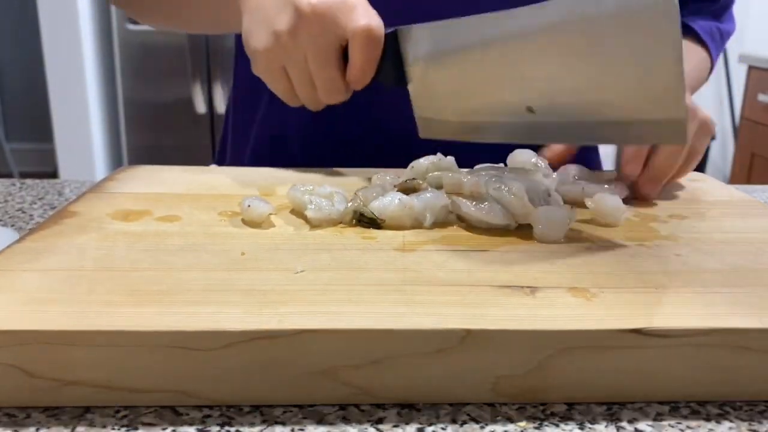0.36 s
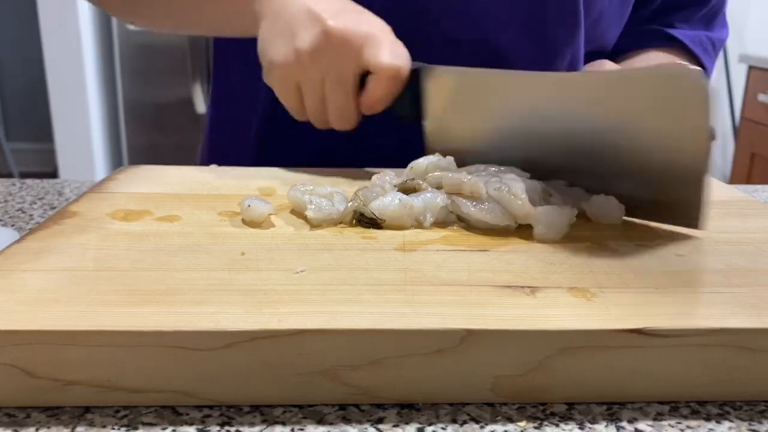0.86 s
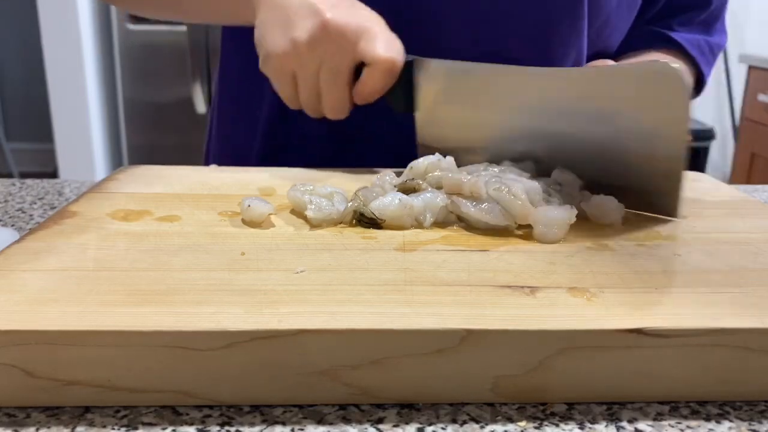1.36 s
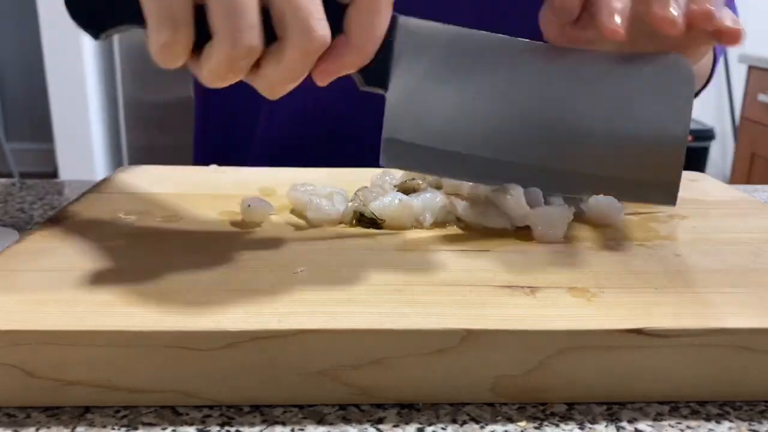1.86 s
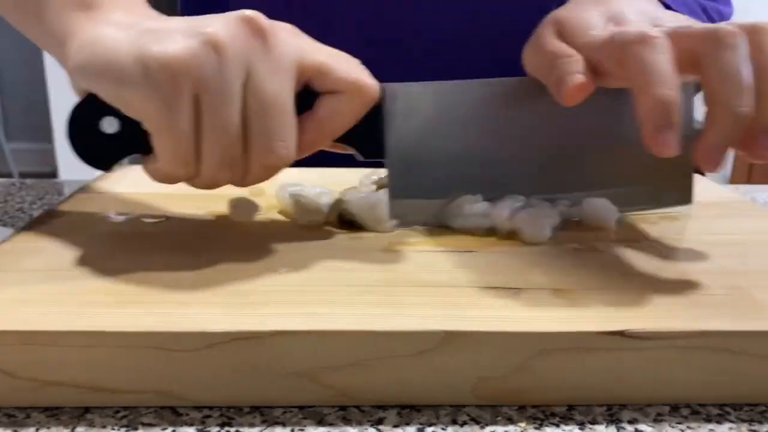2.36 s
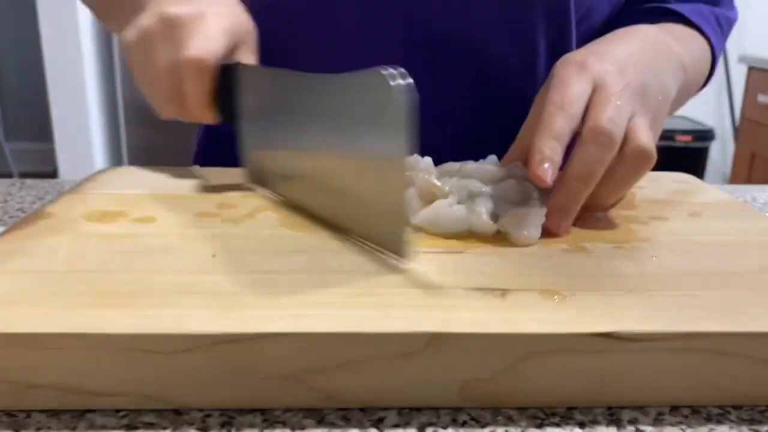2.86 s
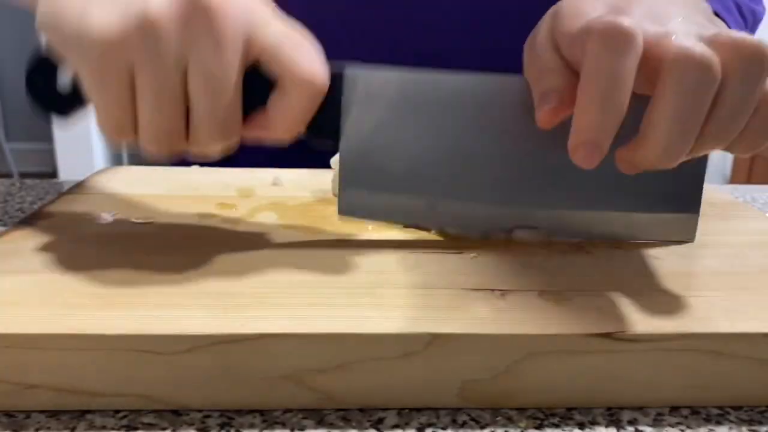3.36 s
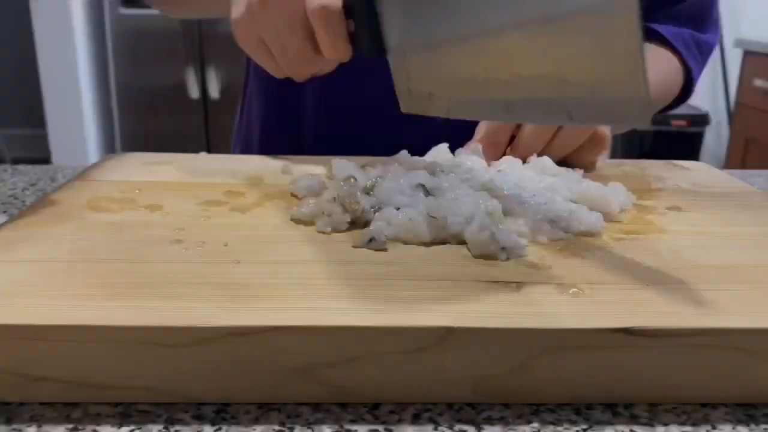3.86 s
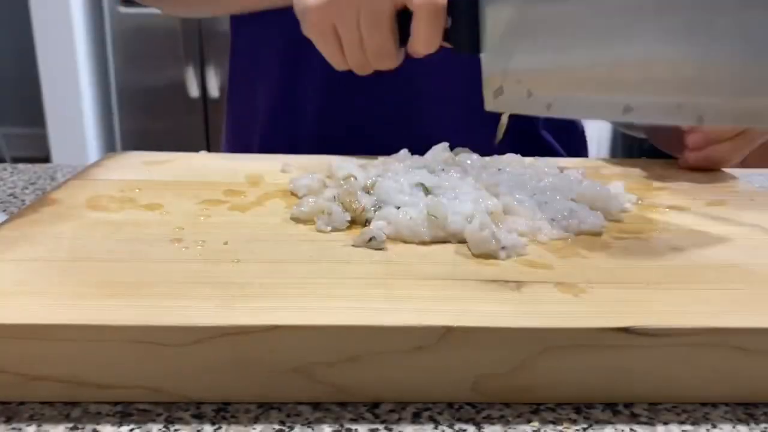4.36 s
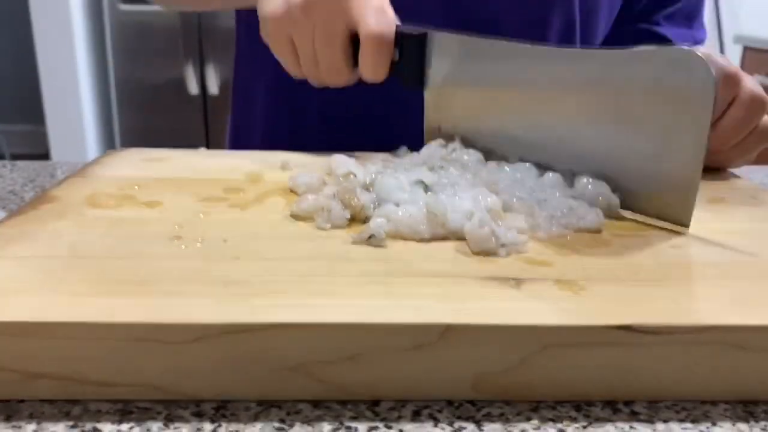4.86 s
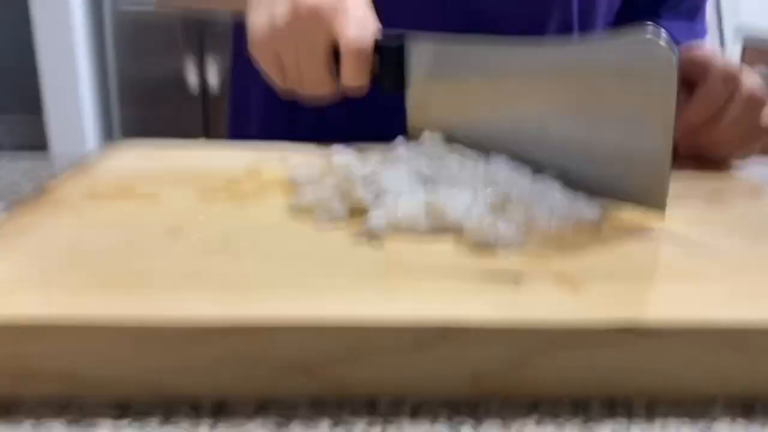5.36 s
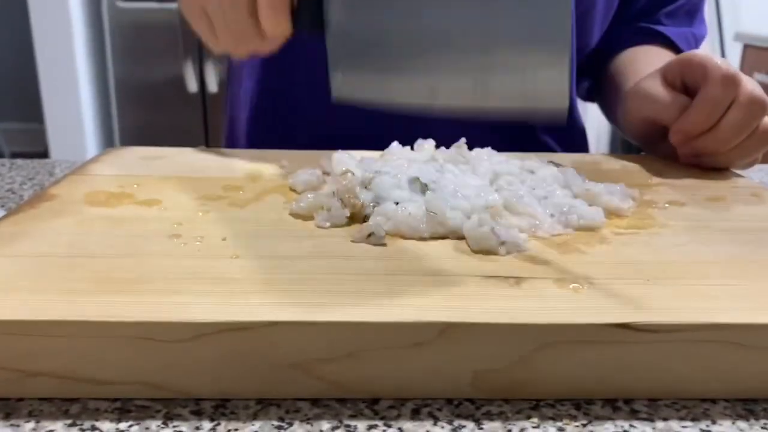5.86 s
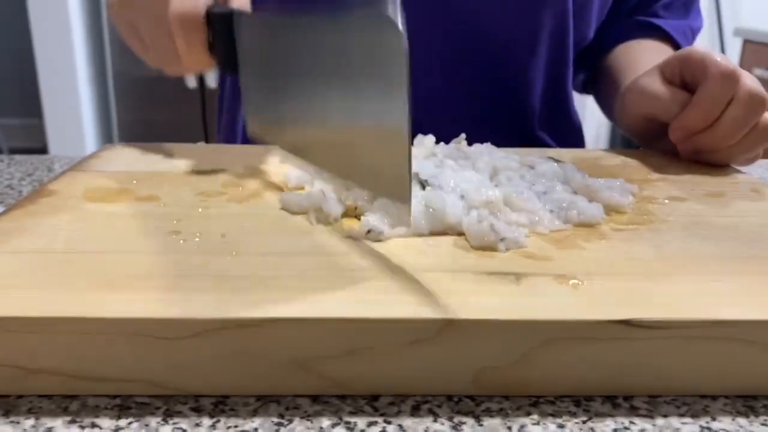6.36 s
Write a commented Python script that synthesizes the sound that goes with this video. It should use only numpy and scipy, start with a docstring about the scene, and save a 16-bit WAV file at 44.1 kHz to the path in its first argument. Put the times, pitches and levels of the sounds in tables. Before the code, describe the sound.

Wet scraping and uneven woody knocks on a cutting board, then rapid regular cleaver chops about nine times a second, with short hard-room reverberation.

```python
"""A cleaver works wet shrimp on a thick board on a stone counter, played faster than life.
To 3.6 s the blade knocks, pushes and scrapes the heap together: noise-driven board modes, hiss, grain, low thuds.
After an edit, entered on the room tail of a chop cut away, it chops about nine times a second.
The speed-up smears every blow into a short noise burst; a small hard kitchen rings behind as decaying noise."""
import sys
import numpy as np
from scipy import signal
from scipy.fft import rfft, irfft, next_fast_len
from scipy.io import wavfile
from scipy.ndimage import uniform_filter1d

SR = 44100
rng = np.random.default_rng(int(sys.argv[2]) if len(sys.argv) > 2 else 0)


def transcribe(u):
    """Save the signal u as a 16-bit wav file named by the first command-line argument.

    u: samples, shape (n,) or (channels, n), limited to [-1, 1]; the rate is SR.
    q: integer samples, one column per channel.
    """
    v = np.clip(np.atleast_2d(u).T, -1, 1)
    q = np.round(v * 32767).astype(np.int16)
    wavfile.write(sys.argv[1], SR, q)


def gain_from_decibels(decibels):
    """Convert decibel values to linear amplitude factors."""
    exponent = np.asarray(decibels, float) / 20
    return 10 ** exponent


N = 296793
PIECE = 8000   # samples in one event
SIZE = next_fast_len(N + SR)
HZ = np.maximum(np.fft.rfftfreq(SIZE, 1 / SR), 1)
EDIT_S = 3.615

# low air of the room: (frequency [Hz], relative level [dB/Hz])
AIR_SPECTRUM = [(15, -31.5), (25, -30), (69, 3), (90, -11.5), (121, -4.5), (142, -23), (176, -16.5),
                (224, -24), (588, -40), (15000, -59)]
# likeness of left and right: (frequency [Hz], correlation [0-1])
STEREO_LIKENESS = [(40, 1), (200, 0.9), (400, 0.71), (650, 0), (1400, 0.34), (3000, 0.42), (7000, 0.54),
                   (8500, 0.98), (13500, .95), (15000, 0.9)]
# phase between left and right, stereo processing flips narrow treble bands:
# (frequency [Hz], left leads by [rad])
STEREO_PHASE = [(60, 0), (7900, 0), (8500, -np.pi), (9500, -np.pi), (10100, -2 * np.pi),
                (12200, -2 * np.pi), (12700, -3 * np.pi), (13700, -3 * np.pi), (14200, -4 * np.pi)]
# level between left and right: (frequency [Hz], left over right [dB])
STEREO_TILT = [(60, 0), (140, 3), (500, -3), (1170, 1.5), (2400, 1.4), (4200, 3.5), (9800, 0.4),
               (15000, -1.5)]
# room decay: (frequency [Hz], T60 [s])
ROOM_DECAY = [(150, 0.55), (400, 0.16), (1500, 0.31), (2600, 0.31), (5000, 0.33), (9000, .25)]
# room drive, before the final treble step: (frequency [Hz], level against direct sound [dB])
ROOM_SPECTRUM = [(150, -19), (330, -25.5), (440, -16), (560, -18.5), (700, -9.5), (1100, -15),
                 (1700, -13.5), (2500, -10.5), (4000, -4.5), (5500, -6.5), (9000, -12.5)]
# light taps on the steel: (time [s], relative level [dB])
BLADE_TAPS = [(1.749, -74.5), (3.066, -75)]
# ringing of the steel: (frequency [Hz], relative level [dB], T60 [s])
BLADE_MODES = [(1214, -7.0, 0.048), (2062, 6.5, 0.078), (2820, -7.5, .06), (5265, 2, .05),
               (6550, -7.5, 0.046)]
# brief coloured squeaks, clanks and knocks:
# (time [s], frequency [Hz], level [dB], rise and fall [ms])
COLOURED_EVENTS = [(0.771, 1190, -52, 14), (0.903, 4840, -53, 16), (0.909, 5630, -57, 15),
                   (1.299, 1920, -57, 11), (1.431, 4220, -52.5, 17), (1.469, 2980, -70, 36),
                   (1.865, 630, -47.5, 24), (2.11, 1420, -52, 15), (2.751, 1130, -33.5, 15.5),
                   (3.07, 1234, -64, 12), (3.222, 2210, -57, 8), (3.469, 401, -49, 24),
                   (6.173, 3530, -37, 8.6), (6.275, 3400, -33, 14)]
# drag speed as hiss level, one list per stretch of scraping, several strokes in each:
# (time [s], level [dB])
SCRAPE_STRETCHES = [
    [(0.0, -60), (0.026, -52.5), (0.066, -61.5), (0.092, -51.5), (0.144, -63), (0.174, -50.5),
     (0.312, -103), (0.362, -75), (0.45, -91)],
    [(0.62, -103), (0.682, -51), (0.736, -62.5), (0.768, -49.5), (0.788, -55), (0.874, -58.5),
     (0.908, -55.5), (0.954, -84), (1.0, -81)],
    [(1.08, -103), (1.116, -71), (1.134, -89.5), (1.212, -57), (1.4, -61.5), (1.432, -47.5), (1.472, -75),
     (1.53, -83), (1.6, -83)],
    [(1.7, -86), (1.75, -66.5), (1.808, -103), (1.866, -73), (1.888, -85), (1.976, -45.5), (1.998, -50.5),
     (2.042, -75.5), (2.08, -98)],
    [(2.08, -71), (2.136, -61), (2.164, -62.5), (2.186, -46.5), (2.2, -58), (2.256, -49), (2.428, -77),
     (2.48, -66), (2.6, -86.5)],
    [(2.7, -98.5), (2.752, -50.5), (2.77, -56), (2.816, -38.5), (2.852, -43), (2.892, -60.5), (3.02, -91),
     (3.068, -66.5), (3.15, -90)],
    [(3.15, -98), (3.226, -62), (3.28, -97), (3.34, -45), (3.378, -75.5), (3.504, -68), (3.534, -40),
     (3.59, -63.5), (3.61, -90)],
]
# how hard each stretch presses: (level [dB])
STRETCH_PRESSURE_DB = [2.5, 2, 3.5, -3, 7, -21, 1]
# wet hiss, fibre grain, board rumble: (frequency [Hz], relative level [dB/Hz])
HISS_SPECTRUM = [(1470, -12.5), (2500, -7), (5870, -8), (6810, -3.5), (8140, -7.5), (11200, -9),
                 (12800, -10.5), (14600, -15.5), (15750, -13), (16100, -95.5)]
GRAIN_SPECTRUM = [(290, -32), (500, -17.5), (611, 1), (766, -10), (1240, -9), (1400, -9.5), (4000, -28),
                  (5200, -49), (8800, -120)]
RUMBLE_SPECTRUM = [(18, -41), (30, -8.5), (65, -2), (162, -10.5), (203, -16.5), (357, -19.5), (424, -20),
                   (700, -37.5), (910, -69), (1540, -120)]
# further low board thuds, alone or beside a blow:
# (time [s], level [dB], pitch [Hz], length scale [ms])
FURTHER_THUDS = [(0.073, -52, 78.5, 7.6), (0.874, -47, 83.4, 28), (1.343, -45, 60.6, 31),
                 (1.881, -27, 86, 13), (1.972, -30.5, 87, 15), (2.045, -53, 93, 19),
                 (2.138, -25.5, 93.4, 45), (2.195, -32, 84.6, 13), (2.493, -36, 110, 35),
                 (2.918, -39, 91, 9.5), (3.364, -34.5, 86, 24), (3.563, -32.5, 105, 14),
                 (3.631, -31.5, 85, 8.8), (5.845, -29, 101, 33), (6.38, -21, 100, 6.6)]
# low board modes, the knock: (frequency [Hz], width [Hz], relative level [dB])
KNOCK_BOARD_MODES = [(225.2, 24.3, -6), (299.5, 20.7, -2.5), (407.8, 49.9, 3.95), (453.3, 84, -1.5)]
# high board modes, the crack: (frequency [Hz], width [Hz], relative level [dB])
CRACK_BOARD_MODES = [(657, 112, -8), (927, 111, -4), (1055, 150, -1), (1182, 157.6, -2.62),
                     (1328, 151, -5.5), (1553, 278, -10), (1902, 184, -11.5), (2196, 133, -12.5),
                     (2470, 157, -14.5), (3440, 240, -21.5), (3900, 1300, -27.5)]
# blade set down or pushed while gathering:
# (time [s], knock [dB], crack [dB], thud [dB], smear scale [ms])
GATHER_KNOCKS = [(0.036, -42, -55, -66, 54), (0.36, -64.5, -63, -52, 23), (0.697, -46, -64, -31, 15),
                 (0.76, -40.5, -56, -37, 25), (1.241, -25.5, -48.5, -28, 18), (1.859, -30, -48, -30, 11),
                 (2.012, -35.5, -46.5, -15.5, 12), (2.125, -31.5, -38.5, -35.5, 17),
                 (2.144, -23, -23, -32, 6.6), (2.756, -15, -24.5, -21, 7), (2.789, -24, -27, -22, 20),
                 (2.832, -26.5, -34, -21.5, 37.4), (3.224, -27.5, -49.5, -22.5, 9.7),
                 (3.338, -40.5, -43.5, -27.5, 12), (3.429, -46.5, -63, -46, 17),
                 (3.541, -40, -41, -26, 12.3)]
# fast chops through the heap: (time [s], knock [dB], thud [dB], splash [dB], smear scale [ms])
FAST_CHOPS = [(4.125, -16.5, -18, -46, 10.8), (4.243, -16, -17, -48, 11.3), (4.362, -16.5, -23, -42.5, 9.7),
              (4.467, -17, -21.5, -46, 11.4), (4.577, -19.5, -22, -50, 11.4),
              (4.686, -28, -20.5, -54.5, 8.2), (4.78, -22.5, -25, -55, 12.5), (4.798, -20, -25, -47.5, 6.2),
              (4.901, -19.5, -21, -49.5, 10.5), (5.004, -17, -19.5, -47.5, 9.4),
              (5.102, -36.5, -20.5, -50.5, 7.4), (5.209, -18, -21.5, -42, 9.7),
              (5.321, -64, -23.5, -51, 23), (5.424, -16, -20, -47.5, 8.5), (5.521, -21, -22, -54, 10.8),
              (5.538, -21.5, -27, -43.5, 8.4), (5.64, -33.5, -19.5, -46.5, 5.3),
              (5.739, -18, -16.5, -46, 11.4), (5.858, -18, -21.5, -46, 12.2), (5.963, -17, -19, -40.5, 7.8),
              (6.067, -19, -19.5, -42, 13.8), (6.178, -20, -23, -37.5, 10.8), (6.277, -17.5, -17, -38, 9.7),
              (6.387, -20.5, -19, -48.5, 16.2), (6.481, -19.5, -18.5, -53.5, 15.4),
              (6.585, -64, -26, -65, 15.5), (6.69, -23, -17.5, -54, 9.1)]
# blade travels along the board: (time [s], thud pitch [Hz], crack against knock [dB])
BLADE_TRAVEL = [(4.1, 103, -2), (4.6, 96.7, -3), (5.2, 96, -0.4), (5.7, 99, -1.9), (6.2, 115, 0.5),
                (6.7, 105, -3.5)]
# chop cut away, heard only through the room:
# (knock [dB], crack [dB], splash [dB], hardness [dB/octave], smear scale [ms])
UNHEARD_CHOP = (-10.5, -18.5, -42, -3, 16.0)


def rms_one(x):
    """Scale to rms 1."""
    return x / np.sqrt(np.mean(x ** 2) + 1e-20)


def at_hz(points, hz=HZ):
    """Read a table at given frequencies, straight on a log axis."""
    table = np.array(points)
    return np.interp(np.log(hz), np.log(table[:, 0]), table[:, 1])


def through(x, response):
    """Filter by a frequency response."""
    return irfft(rfft(x, SIZE) * response, SIZE)[..., :N]


def pair(mid_side):
    """Turn two noises into left and right, alike by frequency."""
    alike = np.clip(at_hz(STEREO_LIKENESS), 0, 1)
    mid, side = rfft(mid_side, SIZE)
    both = np.sqrt(1 + alike) * mid + np.sqrt(1 - alike) * side * [[1], [-1]]
    return irfft(both, SIZE)[:, :N]


def coloured(spectrum):
    """Steady stereo noise of a spectrum, rms 1."""
    return rms_one(through(pair(rng.standard_normal((2, N))), gain_from_decibels(at_hz(spectrum))))


def mottled(x, patchy_db):
    """Shifting wet contact: narrow colours come and go every few hundredths of a second."""
    cells = signal.stft(x, nperseg=512)[2]
    field = rng.standard_normal(cells.shape[1:])
    field = uniform_filter1d(field, size=3, axis=0)   # across frequency
    field = uniform_filter1d(field, size=7, axis=1)   # across time
    gain = rms_one(gain_from_decibels(patchy_db * rms_one(field)))
    return signal.istft(cells * gain, nperseg=512)[1][:, :N]


def resonate(x, modes):
    """Parallel two-pole resonances, signs alternating."""
    out = 0
    for k, (hz, width_hz, level_db) in enumerate(modes):
        r = np.exp(-np.pi * width_hz / SR)
        b = [(1 - r * r) / 2, 0, (r * r - 1) / 2]
        a = [1, -2 * r * np.cos(2 * np.pi * hz / SR), r * r]
        out = out + (-1) ** k * gain_from_decibels(level_db) * signal.lfilter(b, a, x)
    return out


def burst(rise_ms, fall_ms, sharp):
    """Smeared-blow envelope: swells for the rise, dies over the fall, peaks in the middle."""
    ms = np.arange(-PIECE // 2, PIECE // 2) * 1000 / SR
    distance = np.abs(np.where(ms < 0, ms / rise_ms, ms / fall_ms))
    return np.hanning(PIECE) * np.exp(-distance ** sharp)


def add(track, time_s, piece):
    """Lay a piece with its middle at a time."""
    at = round(time_s * SR) - piece.shape[-1] // 2
    low, high = max(at, 0), min(at + piece.shape[-1], N)
    track[..., low:high] += piece[..., low - at:high - at]


def at_peak(piece, level_db):
    """Set the loudest 10 ms of a piece to a level."""
    loudest = uniform_filter1d(np.mean(piece ** 2, axis=0), size=441).max()
    return piece * gain_from_decibels(level_db) / np.sqrt(loudest)


def dulled(x, cutoff_hz):
    """Wood passes little treble: second-order lowpass."""
    return signal.lfilter(*signal.butter(2, cutoff_hz, fs=SR), x)


def air():
    """Low room air: steady coloured noise."""
    return gain_from_decibels(-61) * coloured(AIR_SPECTRUM)


def kitchen(first, second, after):
    """Diffuse wash: sound energy builds and dies at its own rate in each third of an octave."""
    build_s, step = 0.03, 64   # step: samples per energy reading
    out, white = 0, pair(rng.standard_normal((2, N)))
    edges_hz = 134 * 2 ** np.arange(0, 6, 1 / 3)
    heard = np.stack([first.mean(axis=0), second.mean(axis=0)])
    build = np.exp(-step / SR / build_s)
    for k, (low_hz, high_hz) in enumerate(zip(edges_hz, edges_hz[1:])):
        band = signal.butter(2, [low_hz, high_hz], "band", fs=SR, output="sos")
        hz = np.sqrt(low_hz * high_hz)
        power = signal.sosfilt(band, heard) ** 2
        power = power[:, :N // step * step].reshape(2, -1, step).mean(axis=2)
        keep = gain_from_decibels(-120 * step / SR / at_hz(ROOM_DECAY, hz))   # power kept per step
        poles = np.convolve([1, -keep], [1, -build])
        energy = signal.lfilter([0, (1 - keep) * (1 - build)], poles, power + 1e-18)
        held = [np.interp(np.arange(N) / step, np.arange(len(e)), np.sqrt(e)) for e in energy]
        level = held[0] * (1 - after) + held[1] * after
        noise = rms_one(signal.sosfilt(band, white))
        out = out + (-1) ** k * gain_from_decibels(at_hz(ROOM_SPECTRUM, hz)) * level * noise
    return through(out, 0.32 + 0.58 / np.sqrt(1 + (HZ / 2650) ** 20))   # step down in the treble


def blade():
    """Light taps set the steel ringing: noise bursts drive decaying modes."""
    drive, out = np.full(N, 1e-18), 0
    for time_s, level_db in BLADE_TAPS:
        noise = rng.standard_normal(PIECE) * burst(14.0, 14.0, sharp=0.96)
        add(drive, time_s, gain_from_decibels(level_db - 16.5) * noise)
    for hz, level_db, t60_s in BLADE_MODES:
        r, w = gain_from_decibels(-60 / (t60_s * SR)), 2 * np.pi * hz / SR
        b, a = [0, gain_from_decibels(level_db) * np.sin(w)], [1, -2 * r * np.cos(w), r * r]
        out = out + signal.lfilter(b, a, drive)
    return out


def squeaks_and_clanks():
    """Noise caught for a moment by one resonance; louder ones are rougher, wider in band."""
    mean_width_hz, wider_per_db, mean_db = 295, 0.74, -47.5
    out = np.zeros((2, N))
    for time_s, hz, level_db, length_ms in COLOURED_EVENTS:
        width_hz = mean_width_hz * gain_from_decibels(wider_per_db * (level_db - mean_db))
        mode = [(hz, width_hz, 0)]
        tone = resonate(resonate(rng.standard_normal((2, PIECE)), mode), mode)
        add(out, time_s, at_peak(tone * burst(length_ms, length_ms, sharp=1.5), level_db))
    return pair(out) / np.sqrt(2)


def scrapes():
    """Wet edge hiss, fibres catching in fine clicks, board shaking below: all follow the drag."""
    mean_drag_db, grain_db, rumble_db = -55.5, -59, -45.5   # grain and rumble at the mean drag
    grain_follows, rumble_follows = 1, 0.84   # dB per dB of drag
    t, levels = np.arange(N) / SR, np.zeros((3, N))
    for rows, pressure_db in zip(SCRAPE_STRETCHES, STRETCH_PRESSURE_DB):
        drag_db = np.interp(t, *np.transpose(rows), left=-300, right=-300)
        swing_db = drag_db - mean_drag_db
        stretch_grain_db = grain_db + pressure_db + grain_follows * swing_db
        stretch_rumble_db = rumble_db + pressure_db / 2 + rumble_follows * swing_db
        levels += gain_from_decibels(np.array([drag_db, stretch_grain_db, stretch_rumble_db]))
    hiss, grain, rumble = uniform_filter1d(levels, size=400)
    clicks = uniform_filter1d(rng.exponential(1, N) ** 3, size=60) / 6
    catches = rms_one(1 + 0.44 * clicks)
    edge = mottled(hiss * coloured(HISS_SPECTRUM) + grain * coloured(GRAIN_SPECTRUM), patchy_db=3.0)
    return catches * edge + rumble * coloured(RUMBLE_SPECTRUM)


def thuds(rows):
    """Low board thuds: two or three cycles that sag in pitch, in a faint shudder."""
    out, shudder = np.zeros(N), np.zeros(N)
    t = np.arange(-PIECE // 2, PIECE // 2) / SR
    for (time_s, level_db, hz, length_ms), turn in zip(rows, rng.random(len(rows))):
        cycles = hz * t * (1 - 0.091 * np.tanh(t / 0.025))
        wave = np.cos(2 * np.pi * (cycles + 0.5 * turn - .3))
        shape = burst(0.5 * length_ms, 0.39 * length_ms, sharp=1.25)
        add(shudder, time_s, gain_from_decibels(level_db - 14.5) * burst(41.0, 72.0, sharp=1.0))
        add(out, time_s, at_peak((wave * shape)[None], level_db)[0])
    return out + shudder * coloured(RUMBLE_SPECTRUM)


def blows(rows):
    """A sharp core in a smeared halo drives the board modes; wet flesh splashes in the treble."""
    out, wet = np.zeros((2, N)), np.zeros(N)
    for time_s, knock_db, crack_db, wet_db, hardness_db, smear_ms in rows:
        noise = rng.standard_normal((2, 2, PIECE))   # knock and crack, each mid and side
        # board modes vary in strength at random from blow to blow
        random_db = 1.8 * rng.standard_normal(len(CRACK_BOARD_MODES))
        modes = [(hz, width_hz, level_db + hardness_db * np.log2(hz / 1100) + extra_db)
                 for (hz, width_hz, level_db), extra_db in zip(CRACK_BOARD_MODES, random_db)]
        knock_core = burst(2.04, 1.08, sharp=0.99)
        knock_halo = .5 * burst(1.46 * smear_ms, 0.6 * smear_ms, sharp=3.0)
        knock = resonate(noise[0] * (knock_core + knock_halo), KNOCK_BOARD_MODES)
        crack_core = burst(3.8, 1.03, sharp=1.2)
        crack_halo = 1.33 * burst(1.12 * smear_ms, 1.69 * smear_ms, sharp=1.12)
        crack = resonate(noise[1] * (crack_core + crack_halo), modes)
        splash = burst(0.86 * smear_ms, 0.81 * smear_ms, sharp=1.0)
        splash_halo = gain_from_decibels(-16.5) * burst(25.0, 60.0, sharp=1.5)
        add(out, time_s - .002, at_peak(dulled(knock, 900), knock_db))
        add(out, time_s - .004, at_peak(dulled(crack, 4000 * gain_from_decibels(.6 * hardness_db)), crack_db))
        add(wet, time_s - .003, gain_from_decibels(wet_db) * (splash + splash_halo))
    return pair(out) / np.sqrt(2) + mottled(wet * coloured(HISS_SPECTRUM), patchy_db=6.5)


def contacts():
    """Rows for blows() and thuds(); after a blow the board meets the counter just later."""
    knock_hardness_db, knock_thud_hz = -8, 114.6   # dB per octave, Hz
    thud_lag_s, thud_stretch = 0.0069, 1.21   # thud length over smear
    rebound_s, rebound_db = 0.01856, -14   # board lands once more after each chop
    crack_loss, full_knock_db = 0.75, -19   # a weak chop loses crack faster than knock
    chop_hardness_db, harder_per_splash_db, mean_splash_db = -2, 0.31, -46.5   # louder splash, harder
    hits, lows = [], []
    for time_s, knock_db, crack_db, thud_db, smear_ms in GATHER_KNOCKS:
        hits.append((time_s, knock_db, crack_db, -200, knock_hardness_db, smear_ms))
        lows.append((time_s + thud_lag_s, thud_db, knock_thud_hz, thud_stretch * smear_ms))
    travel_s, travel_hz, travel_db = np.transpose(BLADE_TRAVEL)
    for time_s, knock_db, thud_db, wet_db, smear_ms in FAST_CHOPS:
        hz = np.interp(time_s, travel_s, travel_hz)
        crack_db = knock_db + np.interp(time_s, travel_s, travel_db)
        crack_db += crack_loss * min(knock_db - full_knock_db, 0)
        hardness_db = chop_hardness_db + harder_per_splash_db * (wet_db - mean_splash_db)
        hits.append((time_s, knock_db, crack_db, wet_db, hardness_db, smear_ms))
        thud_s, length_ms = time_s + thud_lag_s, thud_stretch * smear_ms
        lows.append((thud_s, thud_db, hz, length_ms))
        lows.append((thud_s + rebound_s, thud_db + rebound_db, 0.93 * hz, length_ms))
    return hits, lows + FURTHER_THUDS


def scene():
    """Blows, thuds and scrapes close by, the room and its low air behind."""
    after = np.clip((np.arange(N) / SR - EDIT_S) / .005, 0, 1)
    hits, lows = contacts()
    near = blows(hits) + thuds(lows) + scrapes()
    unheard = blows([(3.57, *UNHEARD_CHOP)])
    # before the edit the pressing hand damps the blows, which stir the room less
    room = kitchen(gain_from_decibels(-8.0) * near * (1 - after), near * after + unheard, after)
    return near + blade() + squeaks_and_clanks() + room + air()


def roll_off(x):
    """The treble ends steeply here."""
    return signal.sosfilt(signal.butter(12, 16640, fs=SR, output="sos"), x)


def record(dry):
    """Stereo processing turns treble phase between channels; the deepest bass is cut."""
    sides = np.array([[1], [-1]])
    stereo = gain_from_decibels(at_hz(STEREO_TILT) / 2 * sides) * np.exp(.5j * at_hz(STEREO_PHASE) * sides)
    bass_cut = 1 / (1 - (39.3 / HZ) ** 2 - 1.4j * 40.0 / HZ)
    return roll_off(through(dry, stereo * bass_cut))


dry = scene()
out = record(dry)
transcribe(out)
```